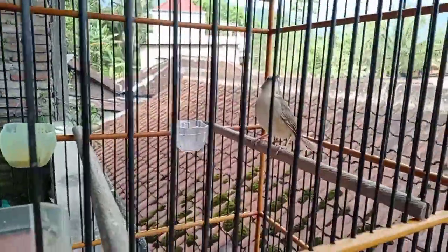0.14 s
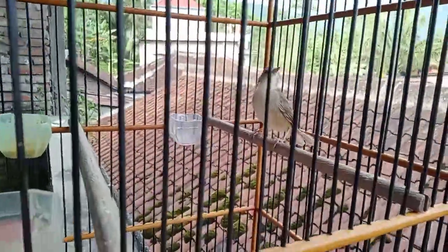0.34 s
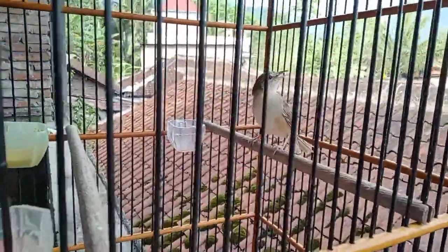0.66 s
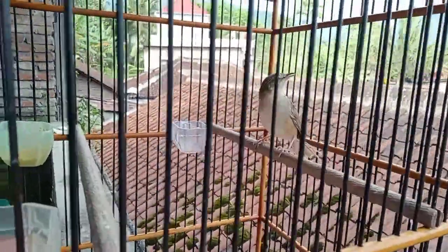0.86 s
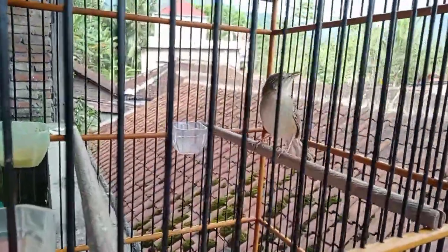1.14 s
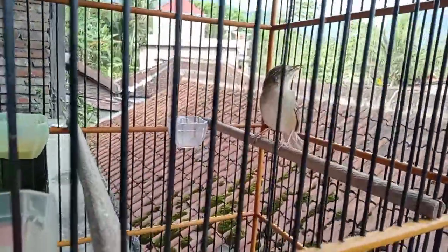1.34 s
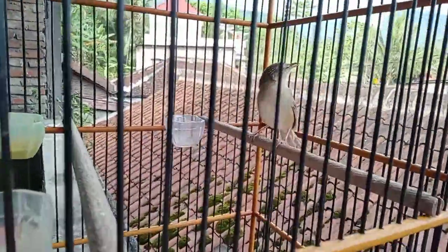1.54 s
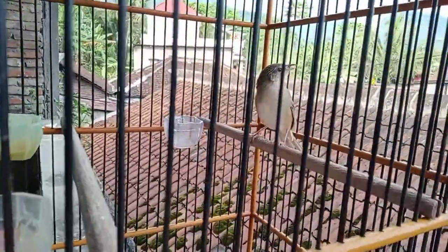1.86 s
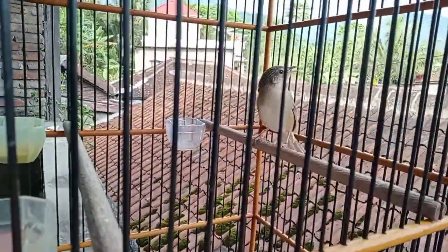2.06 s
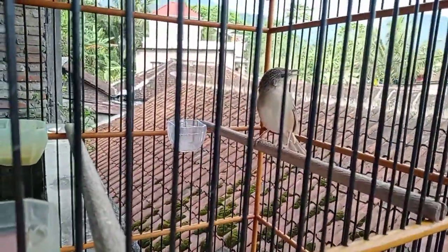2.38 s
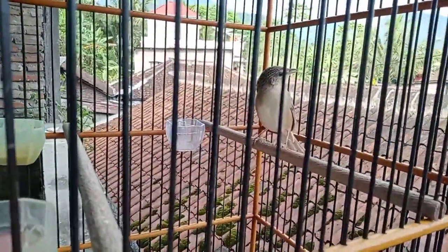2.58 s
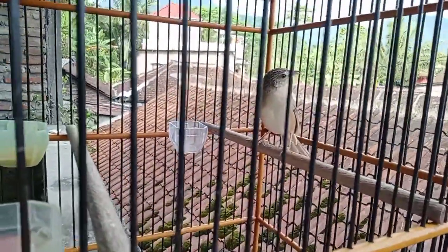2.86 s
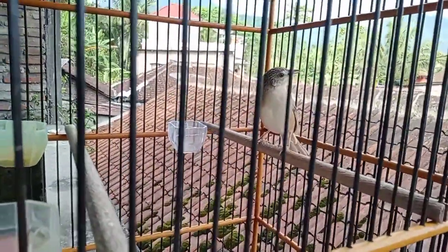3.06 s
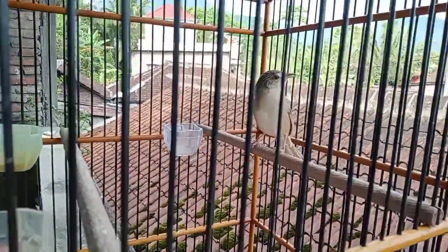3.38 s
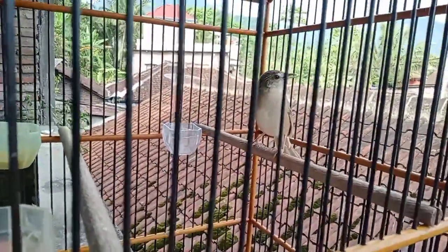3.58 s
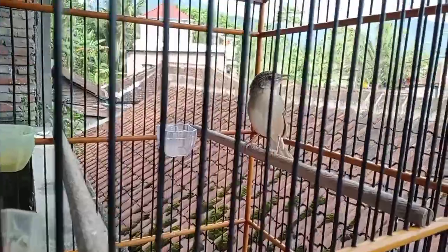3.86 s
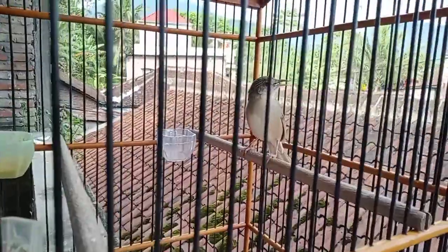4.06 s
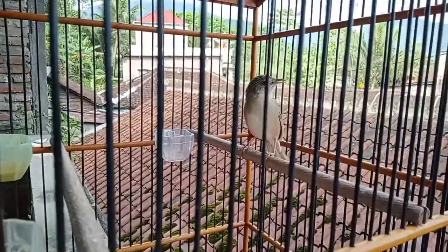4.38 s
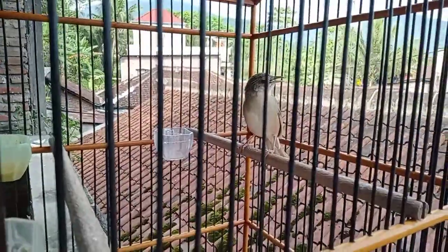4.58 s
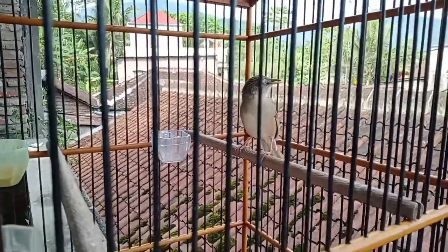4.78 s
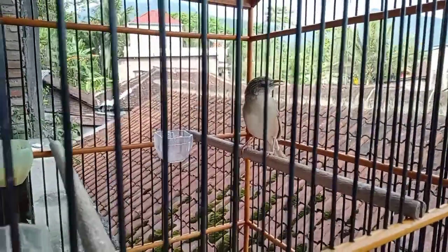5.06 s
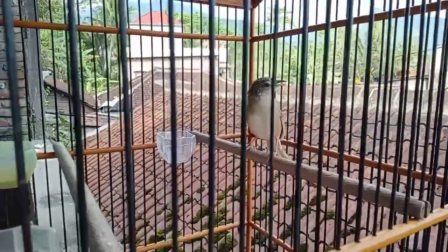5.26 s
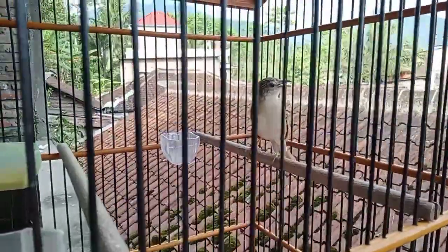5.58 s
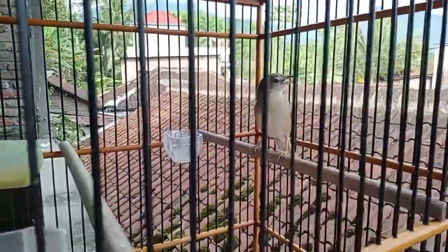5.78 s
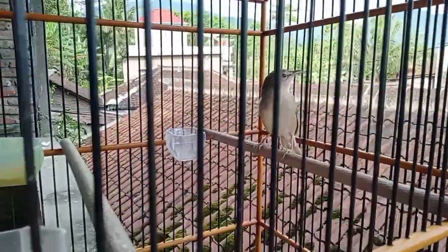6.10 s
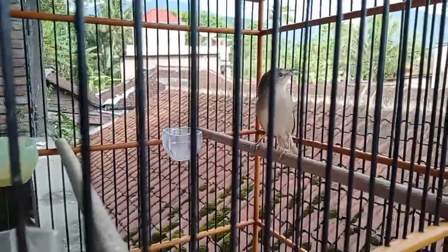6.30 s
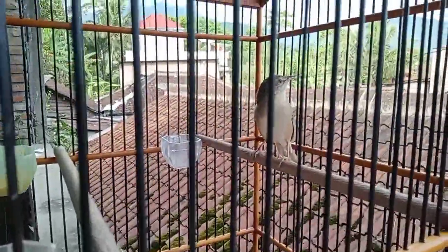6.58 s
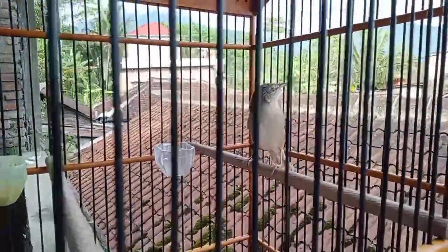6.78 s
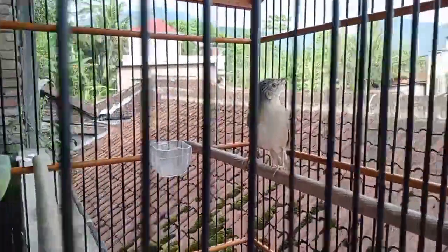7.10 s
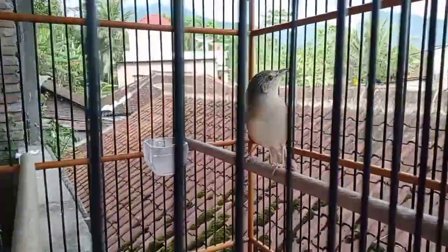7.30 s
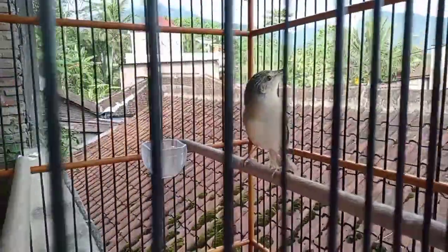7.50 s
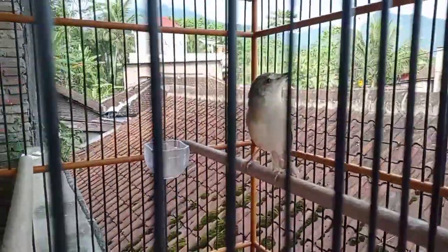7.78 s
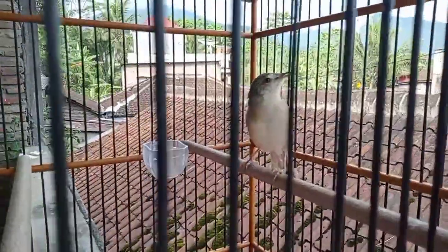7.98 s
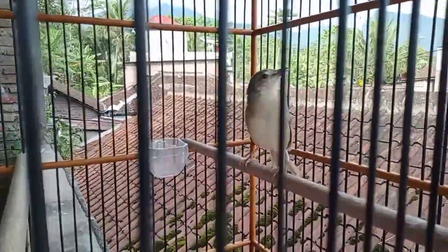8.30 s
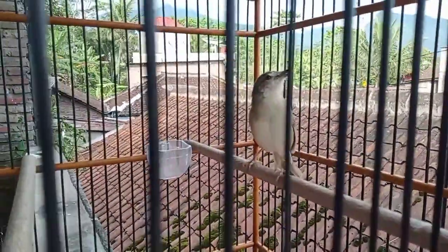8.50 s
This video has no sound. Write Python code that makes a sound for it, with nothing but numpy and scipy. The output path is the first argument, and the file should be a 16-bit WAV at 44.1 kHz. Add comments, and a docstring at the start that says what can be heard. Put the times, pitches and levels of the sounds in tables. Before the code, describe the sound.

A small songbird close to the microphone sings one continuous rapid trill, about ten very short whistled notes a second, each plunging from high to lower pitch. Notes soften slightly, turn longer and higher mid-way, then return to short deep chirps. Small cage knocks tick past three and near five seconds. Quiet rooftop air, low rumble and far engines lie beneath, with brief reflections off near walls.

```python
"""Caged songbird on a roof terrace

A small songbird trills without a break in a cage, about ten notes a second. Each note is one whistle that
plunges from 7 or 8 kHz through the resonances of throat and beak, and echoes off near walls.
Three knocks ring the resonances of the cage. Below lie a faint hum, far engines as harmonics of a
firing rate, thin whistles of far birds, and the rumble, roar and hiss of the open air as shaped noise."""
import sys
import numpy as np
from scipy import signal
from scipy.fft import rfft, irfft, next_fast_len
from scipy.io import wavfile
from scipy.ndimage import map_coordinates

SR = 44100
rng = np.random.default_rng(int(sys.argv[2]) if len(sys.argv) > 2 else 0)


def dump_mix(stems):
    """Bounce the given channels to the path in sys.argv[1] as a 16-bit WAV at rate SR."""
    frames = np.atleast_2d(stems).T  # one column per channel
    limited = np.clip(frames, -1, 1)  # hard clip at full scale
    pcm = np.round(limited * 32767).astype(np.int16)
    wavfile.write(sys.argv[1], SR, pcm)


N = 381465
TIME = np.arange(N) / SR   # seconds
CUTOFF_HZ = 15600   # upper limit of the sound

# Spectrum of the high hiss, which also colours the turbulence of the song.
# Each row: frequency in Hz, relative density in dB per Hz.
HISS_SPECTRUM = [(4000, -23), (7000, 4), (8500, -4), (10000, -1), (12000, -17), (15500, -5)]


def from_db(db):
    """Amplitude ratio of a level: 20 dB for each factor of ten."""
    return 10 ** (np.asarray(db) / 20)


def rms_one(x):
    """Normalisation to unit root-mean-square amplitude."""
    return x / np.sqrt(np.mean(x ** 2) + 1e-20)


def in_time(rows):
    """Linear interpolation: each column of a curve table at every sample."""
    s, *columns = np.transpose(rows)
    return [np.interp(TIME, s, c) for c in columns]


def at_hz(points, hz):
    """Interpolation of a spectrum in dB along a logarithmic frequency axis."""
    freqs, level_db = np.transpose(points)
    return np.interp(np.log(np.maximum(hz, 1)), np.log(freqs), level_db)


def colour(x, points):
    """Linear filtering by a spectrum that falls 24 dB per octave faster beyond its end points."""
    hz = np.maximum(np.fft.rfftfreq(len(x), 1 / SR), 1)
    octaves_outside = np.abs(np.log2(hz / np.clip(hz, points[0][0], points[-1][0])))
    gain = from_db(at_hz(points, hz) - 24 * octaves_outside)
    return irfft(rfft(x) * gain, len(x))


def noise(points):
    """Gaussian noise shaped by a spectrum, with unit rms."""
    white = rng.standard_normal(next_fast_len(N))
    return rms_one(colour(white, points)[:N])


def drift(rate_hz):
    """Slow random fluctuation of unit rms: noise through a low-pass with two equal poles."""
    step = 100   # samples between computed values
    r = np.exp(-2 * np.pi * rate_hz * step / SR)
    white = rng.standard_normal(N // step + 1002)
    slow = signal.lfilter([1], [1, -2 * r, r * r], white)[1000:]   # past the build-up
    return np.interp(np.arange(N) / step, np.arange(len(slow)), rms_one(slow))


def add(out, start_s, sound):
    """Superposition: a sound is summed in at its start time."""
    at = max(round(start_s * SR), 0)
    out[at:at + len(sound)] += sound[:max(N - at, 0)]


def ring(force, hz, t60):
    """A driven, damped resonator with unit gain at its peak; t60 is its 60 dB decay in seconds."""
    r = from_db(-60 / (t60 * SR))
    b = [(1 - r * r) / 2, 0, (r * r - 1) / 2]
    a = [1, -2 * r * np.cos(2 * np.pi * hz / SR), r * r]
    return signal.lfilter(b, a, force + 1e-18)


def open_air(surge_db=1.73, roar_db=-48.0, roar_follows=0.74, air_db=-46, air_follows=0.93):
    """Broadband noise in four bands; the roar of the town and the rush of the air share one swell."""
    # Spectra. Each row: frequency in Hz, relative density in dB per Hz.
    rumble_spectrum = [(30, -24), (50, -19.5), (63, -15), (80, -10), (100, -15.5), (125, 1.5), (155, 6),
                       (190, 2), (230, -12), (320, -31)]
    roar_spectrum = [(170, -7), (250, -3.5), (340, 2), (450, -3.5), (650, -9), (1000, -18), (1600, -32)]
    air_spectrum = [(450, -15), (800, -1.5), (1200, -2.5), (1900, 1.5), (2600, 2), (4000, -10.5),
                    (7000, -15), (10000, -38)]
    # Level of the low rumble about which it surges. Each row: time in seconds, level in dB.
    rumble_curve = [(0, -38), (.9, -39.5), (2.5, -39), (3.3, -43), (3.65, -36), (4.7, -42), (5.35, -34),
                    (6.1, -41.5), (7.1, -39), (7.6, -45.5), (8.65, -35.5)]
    # Level of the high hiss. Each row: time in seconds, level in dB.
    hiss_curve = [(0, -57), (2.1, -63), (3.5, -59.5), (4.35, -54.5), (4.75, -57), (5.4, -59), (8.65, -62.5)]
    # Swell of the town; only departures from its mean count. Each row: time in seconds, level in dB.
    town_curve = [(0.0, -42), (0.26, -42), (2.17, -52), (3.35, -51), (4.07, -47), (4.6, -46.5), (6.74, -54),
                  (8.14, -53.5), (8.65, -50)]
    rumble_db, = in_time(rumble_curve)
    hiss_db, = in_time(hiss_curve)
    town_db, = in_time(town_curve)
    swell_db = town_db - town_db.mean()
    rumble = from_db(rumble_db + surge_db * drift(4.4)) * noise(rumble_spectrum)
    roar = from_db(roar_db + roar_follows * swell_db) * noise(roar_spectrum)
    air = from_db(air_db + air_follows * swell_db) * noise(air_spectrum)
    hiss = from_db(hiss_db) * noise(HISS_SPECTRUM)
    return rumble + roar + air + hiss


def hum(unsteady=0.0043, fading_db=1.0):
    """A faint motor hum: sinusoids that share one unsteady rotation and fade independently."""
    # Partials. Each row: mean frequency in Hz, rms level in dB before fading.
    partials = [(75.4, -60), (150.7, -47)]
    warped_time = np.cumsum(1 + unsteady * drift(2.4)) / SR
    out = np.zeros(N)
    for hz, db in partials:
        amplitude = np.sqrt(2) * from_db(db + fading_db * drift(2.4))
        out += amplitude * np.sin(2 * np.pi * hz * warped_time)
    return out


def far_engines(unsteady=0.0021, fading_db=5.5, whirr_db=-3, count=15):
    """Harmonics of the firing rate, each fading on its way over the roofs, under a mechanical whirr."""
    # Course of the engines. Each row: time in seconds, mean firings per second, common level in dB.
    engine_course = [(0, 38.3, -40.5), (.6, 39.2, -41), (1.5, 39, -47.5), (1.9, 41.5, -53), (3.4, 32, -64),
                     (3.7, 31.4, -48.5), (5.55, 32, -47), (5.8, 30, -56), (8.65, 31.4, -65)]
    # Exhaust resonance. Each row: frequency in Hz, gain in dB.
    exhaust = [(35, -16), (75, -0.5), (100, -10), (122, 4), (160, -7.5), (195, -4.5), (245, -2.5),
               (275, -8.5), (310, -4), (350, -4.5), (400, -29.5), (470, -18), (600, -12)]
    # Spectrum of the whirr. Each row: frequency in Hz, relative density in dB per Hz.
    whirr_spectrum = [(1100, -9), (1470, -17), (1580, 0.5), (1720, -19), (2000, 1.5), (2200, -5.5),
                      (2900, -13)]
    firings, level_db = in_time(engine_course)
    phase = 2 * np.pi * np.cumsum(firings * (1 + unsteady * drift(1.73))) / SR
    harmonics = np.zeros(N)
    for k in range(2, count + 1):
        amplitude = from_db(at_hz(exhaust, k * firings) + fading_db * drift(0.7))
        harmonics += amplitude * np.sin(k * phase + rng.uniform(0, 2 * np.pi))
    return from_db(level_db) * (harmonics + from_db(whirr_db) * noise(whirr_spectrum))


def far_whistles(fading_db=4, waver=0.0028):
    """Far birds: thin sinusoids of nearly level pitch, modulated slowly in frequency and amplitude."""
    # Each row: start in seconds, length in seconds, start pitch in Hz, end pitch in Hz,
    # level in dB before fading.
    whistles = [(2.88, 0.077, 3460, 3530, -40), (6.72, 0.44, 2790, 2780, -44.5),
                (7.107, 0.5, 2800, 2710, -52)]
    out = np.zeros(N)
    for s, length_s, start_hz, end_hz, level_db in whistles:
        hz = np.linspace(start_hz, end_hz, round(length_s * SR))
        hz = hz * (1 + waver * drift(10)[:len(hz)])
        envelope = from_db(level_db) * signal.windows.tukey(len(hz), .5)
        add(out, s, envelope * np.sin(2 * np.pi * np.cumsum(hz) / SR))
    return out * from_db(fading_db * drift(11))


def terrace(x, wet_db=-12, t60=0.11, build_s=0.0073, late_db=-21, late_t60=0.16, late_build_s=0.0079,
            echoes_per_s=1500, count=4):
    """Reverberation by convolution; crossfaded echo patterns change as the microphone moves."""
    # Colour of the sound scattered by walls and eaves. Each row: frequency in Hz, gain in dB.
    scatter = [(2000, 19), (2500, 16), (3000, 10.5), (3700, -0.5), (5000, 4.5), (6500, 6), (8000, 11),
               (11000, -1), (16000, 12)]
    # Colour of the late tail. Each row: frequency in Hz, gain in dB.
    late_colour = [(2000, 0), (2500, 9), (3000, -2.5), (3800, 10.5), (5000, -38), (7000, 12), (16000, -14)]
    t, out = np.arange(SR // 2) / SR, np.zeros(N)
    early = (1 - np.exp(-(t / build_s) ** 2)) * from_db(-60 * t / t60)
    late = (1 - np.exp(-t / late_build_s)) * from_db(-60 * t / late_t60)
    for k in range(count):
        # sparse echoes of random sign, then a dense tail
        arrivals = (rng.random(len(t)) < echoes_per_s / SR) * rng.choice([-1, 1], len(t))
        response = from_db(wet_db) * colour(rms_one(arrivals * early), scatter)
        tail = rms_one(rng.standard_normal(len(t)) * late)
        response += from_db(late_db) * colour(tail, late_colour)
        position = TIME / TIME[-1] * (count - 1)
        nearness = np.cos(np.pi / 2 * np.clip(position - k, -1, 1))
        out += nearness * signal.oaconvolve(x, response / np.sqrt(len(t)))[:N]
    return out


def near_echoes(x, sway_s=.00007):
    """Specular reflections: delayed copies whose delays sway with the hand that holds the microphone."""
    # Near surfaces. Each row: mean delay in seconds, level in dB with the microphone far,
    # level in dB with it close.
    surfaces = [(.0016, -52, -9), (.0049, -7, -8), (.0079, -26, -6.5), (0.0123, -29, -14)]
    # Approach of the microphone. Each row: time in seconds, share of the way from far to close (0-1).
    approach = [(0, 0.4), (6.6, 0.7), (7.3, 0.8), (8.65, 0.99)]
    closer, = in_time(approach)
    out = np.zeros(N)
    for delay_s, far_db, near_db in surfaces:
        lag_s = delay_s + sway_s * drift(0.71)
        gain = from_db(far_db + (near_db - far_db) * closer)
        out += gain * map_coordinates(x, [(TIME - lag_s) * SR], order=3)
    return out


def bars(x, ring_db=5.0):
    """Sympathetic resonance: the near sounds leave narrow modes of the cage ringing."""
    # Cage modes. Each row: frequency in Hz, relative level in dB, 60 dB decay in seconds.
    bar_modes = [(2574, -1, .3), (2855, -5, .35), (3125, -18, .3), (3371, -15, .3), (3762, -18, .3),
                 (3970, -18, .22), (4172, -18, .2), (6154, -14, .15), (6545, -12, .15)]
    return sum(from_db(db + ring_db) * ring(x, hz, t60) for hz, db, t60 in bar_modes)


def cage_knocks(snap_decay_s=0.0071, main_db=16, main_t60=0.0084):
    """Impact excitation: a rattle of contacts rings the struck part and wooden frame under a dry snap."""
    # Each row: time in seconds, level of the contacts in dB, level of the snap in dB,
    # decay constant of the rattle in seconds, main pitch in Hz.
    knocks = [(3.294, -30, -25.5, .008, 1650), (3.608, -41, -65, 0.07, 1240),
              (4.811, -30.5, -32, 0.0067, 1780)]
    # Modes of the frame. Each row: frequency in Hz, gain in dB, 60 dB decay in seconds.
    frame_modes = [(955, 17, 0.076), (1250, 14, 0.016), (1660, 8, 0.047), (2090, 8.5, 0.014),
                   (2540, 22.5, 0.04), (3290, 20, 0.04)]
    # Spectrum of the snap. Each row: frequency in Hz, relative density in dB per Hz.
    snap_spectrum = [(2000, 1), (4500, -3), (6500, 11), (8500, 3), (10000, -1), (12500, -28), (14500, 4),
                     (16000, -3)]
    out, snap, t = np.zeros(N), np.zeros(N), np.arange(SR // 3) / SR
    for s, level_db, snap_db, decay_s, main_hz in knocks:
        contacts = from_db(level_db) * np.exp(-t / decay_s) * rng.standard_normal(len(t))
        frame = sum(from_db(db) * ring(contacts, hz, t60) for hz, db, t60 in frame_modes)
        struck_part = from_db(main_db) * ring(contacts, main_hz, main_t60)
        add(out, s, frame + struck_part)
        add(snap, s, from_db(snap_db) * np.exp(-t / snap_decay_s))
    return out + snap * noise(snap_spectrum)


def song():
    """Correlated control: phrase gives pitch and length of each note, from which its sweep follows."""
    # Notes of the trill. Each row: time in seconds, level in dB before throat and flutter.
    notes = [(0.0474, -11.0), (0.143, -10.5), (0.2385, -11.5), (0.3348, -11.5), (0.435, -11.0),
             (0.537, -11.5), (0.6313, -12.5), (0.7325, -11.0), (0.8332, -14), (0.9319, -14.5),
             (1.0322, -14), (1.1371, -14.0), (1.2413, -13.0), (1.35, -13.5), (1.456, -14.5), (1.558, -15.5),
             (1.6641, -14.5), (1.767, -16.0), (1.8734, -16), (1.9933, -16.5), (2.0976, -16),
             (2.1977, -16.5), (2.3032, -16.5), (2.4079, -14), (2.518, -14.5), (2.6277, -15.0),
             (2.7328, -16.0), (2.8475, -14), (2.9599, -14), (3.0688, -13.5), (3.1751, -15), (3.2799, -12),
             (3.3808, -14.0), (3.4756, -13), (3.576, -12.5), (3.673, -13), (3.7697, -12.5), (3.8707, -14.0),
             (3.9729, -14), (4.0786, -14), (4.1858, -13.0), (4.294, -13.5), (4.4003, -14), (4.511, -14),
             (4.622, -13.0), (4.726, -13), (4.8347, -13), (4.9332, -12.0), (5.0343, -12), (5.1354, -12.0),
             (5.2315, -12.5), (5.333, -11.5), (5.4321, -11), (5.5343, -11), (5.6331, -11), (5.729, -12),
             (5.825, -12.0), (5.9208, -12.5), (6.0192, -13.5), (6.12, -14), (6.2207, -15.0), (6.3205, -14),
             (6.4171, -15), (6.5111, -13), (6.6115, -13.5), (6.71, -15), (6.8073, -13.5), (6.9085, -15.5),
             (7.0071, -14.5), (7.1047, -14.0), (7.201, -13.5), (7.2998, -12.5), (7.3992, -13),
             (7.5009, -12.5), (7.6005, -12), (7.6944, -13), (7.79, -11.5), (7.8904, -12.0), (7.9882, -11),
             (8.0894, -11.0), (8.1882, -11.5), (8.289, -11.5), (8.3891, -11.5), (8.4915, -11.0),
             (8.5888, -10.5)]
    # Shape of the phrase, from short deep plunges to long high notes and back. Each row: time in
    # seconds, mean pitch the sweeps settle toward in Hz, note length in seconds before any cut.
    phrase = [(0.0, 2970, 0.02), (0.3, 2840, 0.018), (0.597, 2300, 0.018), (1.15, 2060, 0.018),
              (1.8, 2520, 0.019), (3.3, 2520.0, 0.019), (3.548, 3040, 0.021), (3.719, 3750, 0.028),
              (4.089, 3708, 0.038), (4.719, 3675, 0.0353), (4.843, 3640, 0.024), (5.027, 3574, 0.023),
              (5.3, 2810, 0.016), (5.952, 2720, 0.018), (6.2, 2300, 0.02), (7.59, 2200, 0.02),
              (7.849, 1800, 0.02), (8.65, 1910, 0.017)]
    # a middling note: time constant of its sweep, the pitch it settles toward, its level
    usual_sweep_s, usual_hz, usual_db = 0.011, 2472, -13
    # higher notes settle sooner, louder ones more slowly
    pitch_power, slowing_per_db = 0.489, 0.03
    # the longer a note, the lower it starts to sound
    opening_base_hz, opening_drop_hz_per_s = 9043, 46700
    # chance from note to note, as shares
    pitch_spread, opening_spread = 0.0062, 0.024
    # plunges that aim deeper than this pitch are let go early
    full_length_hz, cut_short_s_per_hz = 2700, 0.0000013

    s, level_db = np.transpose(notes)
    when, *controls = np.transpose(phrase)
    settle_hz, length_s = (np.interp(s, when, c) for c in controls)
    chance = rng.standard_normal((len(s), 2))
    settle_hz = settle_hz * (1 + pitch_spread * chance[:, 0])
    length_s = length_s - cut_short_s_per_hz * np.maximum(full_length_hz - settle_hz, 0)
    sweep_s = usual_sweep_s * (usual_hz / settle_hz) ** pitch_power
    sweep_s = sweep_s * np.exp(slowing_per_db * (level_db - usual_db))
    opening_hz = opening_base_hz - opening_drop_hz_per_s * length_s
    opening_hz = opening_hz * (1 + opening_spread * chance[:, 1])
    return zip(s, opening_hz, settle_hz, sweep_s, length_s, level_db)


def bird(lead_s=.006, attack_s=0.0035, release_s=0.0057, sag_hz_per_s=80000, early_sag_s=0.0019,
         held_s=0.0082, trail_db=-30, trail_s=0.05, half_db=-15, half_delay_s=0.0016, half_s=0.0018,
         third_db=-3, rasp_db=-46, waver=0.0078, flutter_db=0.87):
    """Source and filter: an exponential glide through the throat sags and dies as the pressure lets go."""
    # Throat and beak. Each row: pitch in Hz, gain in dB.
    throat = [(2000, -46), (2500, -3), (2900, -6), (3250, 3.5), (3750, 5), (4300, 1.5), (5000, -9),
              (5700, -2.5), (6500, -1.5), (7200, -5), (7800, -9.5), (8600, -24)]
    # Overtones. Each row: frequency of the overtone in Hz, octave's strength in dB re the note
    # before the throat acts on it.
    overtone = [(5000, -42), (7500, -42), (8700, -37.5), (10200, -26), (12000, -39), (15500, -32)]
    sweep_top_hz = 7000   # pitch at the note's listed time
    lowest_hz = 1700
    out, t = np.zeros(N), np.arange(SR // 13) / SR - lead_s
    wobble, flutter, turbulence = drift(136), drift(86), noise(HISS_SPECTRUM)
    for s, opening_hz, settle_hz, sweep_s, length_s, level_db in song():
        here = np.minimum(round(s * SR) + np.arange(len(t)), N - 1)
        # high notes hold their pitch until they have almost faded
        sag_start = length_s + np.interp(settle_hz, [2800, 3600], [-early_sag_s, held_s])
        glide_hz = settle_hz + (sweep_top_hz - settle_hz) * np.exp(-t / sweep_s)
        hz = glide_hz - sag_hz_per_s * np.maximum(t - sag_start, 0)
        swinging = np.clip((hz - lowest_hz) / 400, 0, 1)   # a slack membrane falls silent
        hz = np.maximum(hz, lowest_hz) * (1 + waver * wobble[here])
        phase = 2 * np.pi * np.cumsum(hz) / SR

        # time since the glide passed the opening pitch
        age = t + sweep_s * np.log((opening_hz - settle_hz) / (sweep_top_hz - settle_hz))
        opening = np.sin(np.pi / 2 * np.clip(age / attack_s, 0, 1)) ** 2
        released = np.maximum(t - length_s + early_sag_s, 0)
        trail = from_db(trail_db) * np.exp(-(released / trail_s) ** 4)
        closing = np.maximum(np.exp(-(released / release_s) ** 2), trail)

        whistle = from_db(at_hz(throat, hz)) * (np.sin(phase) + from_db(rasp_db) * turbulence[here])
        for k, extra_db in [(2, 0), (3, third_db)]:
            strength = from_db(at_hz(overtone, k * hz) + extra_db)
            whistle += strength * np.sin(k * phase) * (k * hz < CUTOFF_HZ)
        # the note catches with a brief blip an octave below
        half_envelope = from_db(half_db) * np.exp(-((age - half_delay_s) / half_s) ** 2)
        half = half_envelope * np.sin(phase / 2)
        note = opening * closing * swinging * whistle + half
        add(out, s - lead_s, from_db(level_db + flutter_db * flutter[here]) * note)
    return out


def scene():
    """Superposition of bird and cage, their echoes, and the surroundings."""
    near = bird() + cage_knocks()
    echoes = near_echoes(near) + terrace(near) + bars(near)
    surroundings = far_whistles() + far_engines() + hum() + open_air()
    return (near + echoes + surroundings)[None]


def record(dry):
    """Band limitation: a steep elliptic low-pass removes the top."""
    low_pass = signal.ellip(10, .1, 70, CUTOFF_HZ, fs=SR, output="sos")
    return signal.sosfilt(low_pass, dry)


dry = scene()
out = record(dry)
dump_mix(out)
```